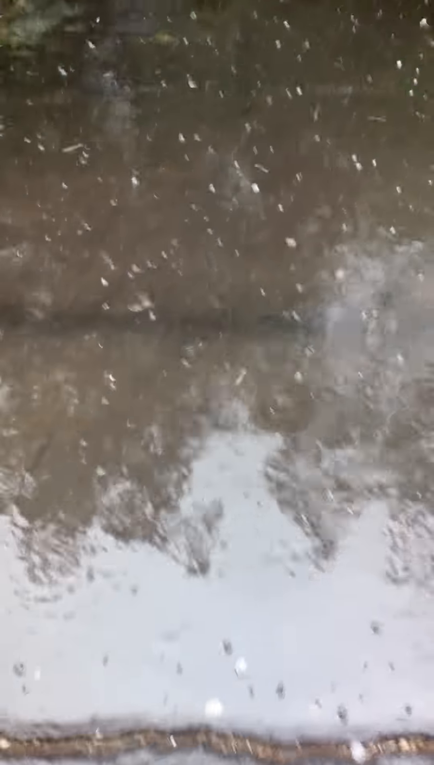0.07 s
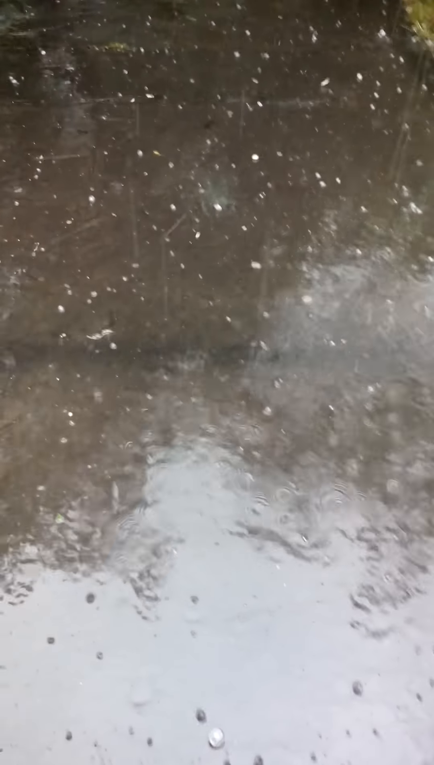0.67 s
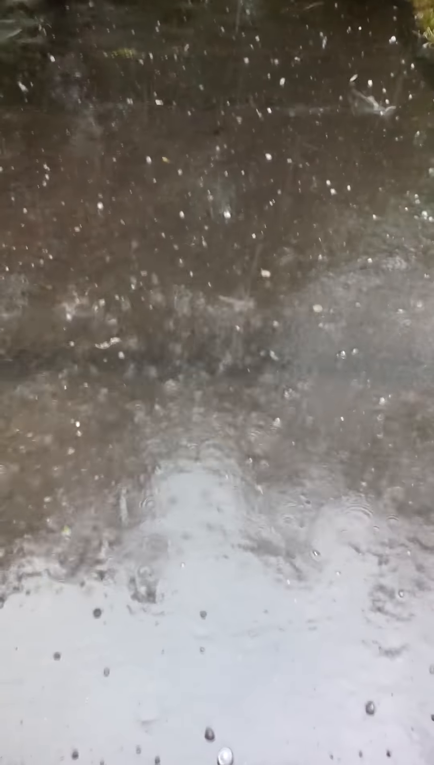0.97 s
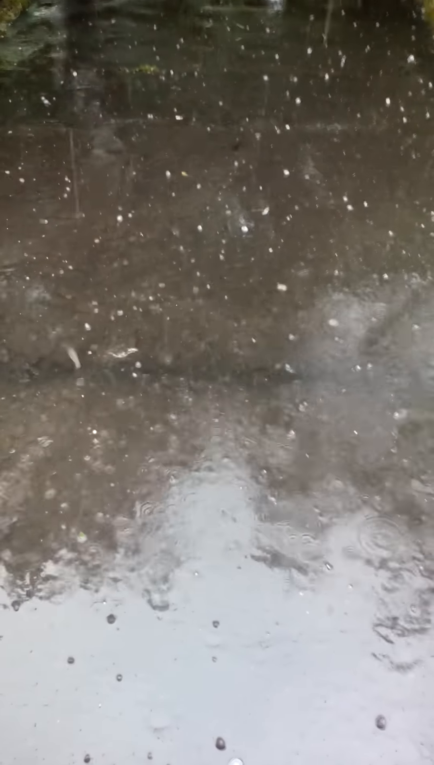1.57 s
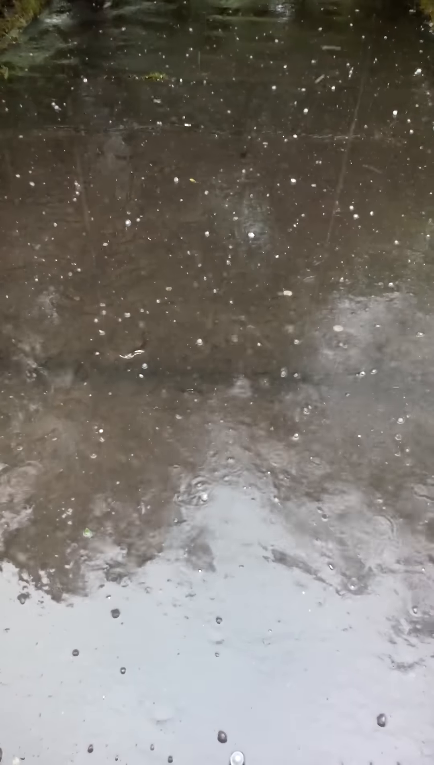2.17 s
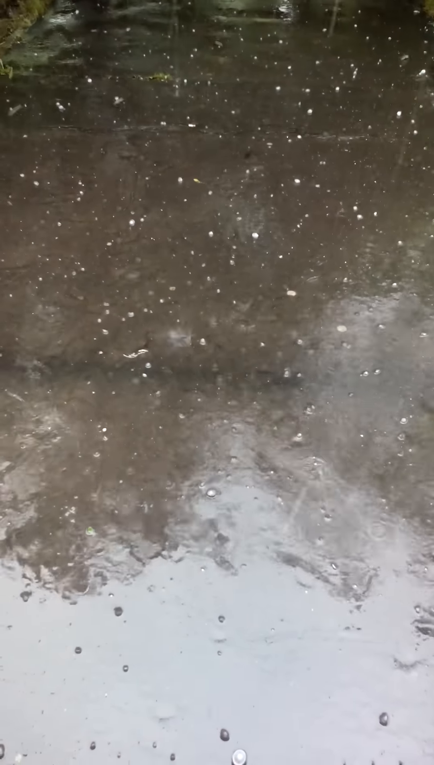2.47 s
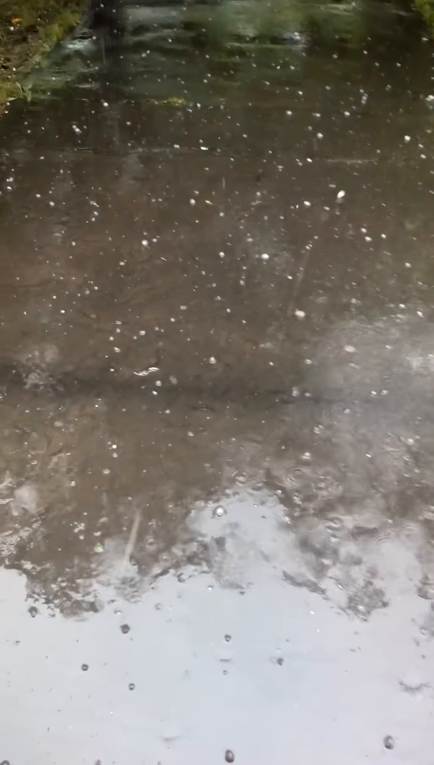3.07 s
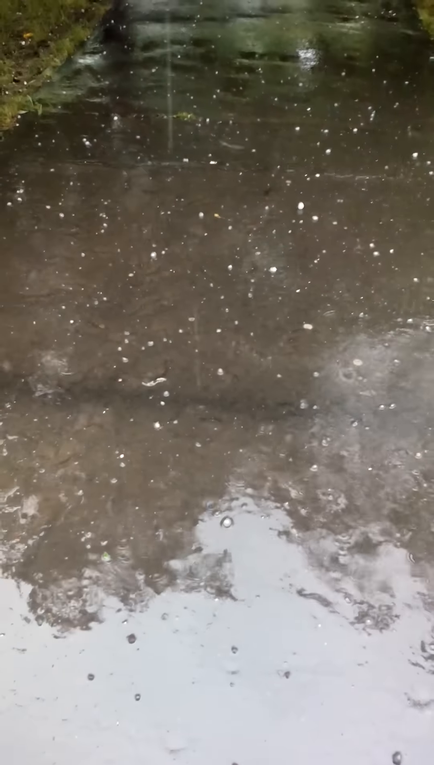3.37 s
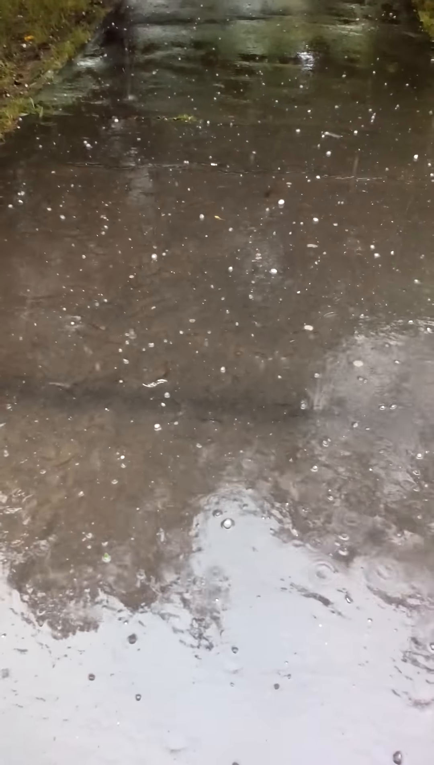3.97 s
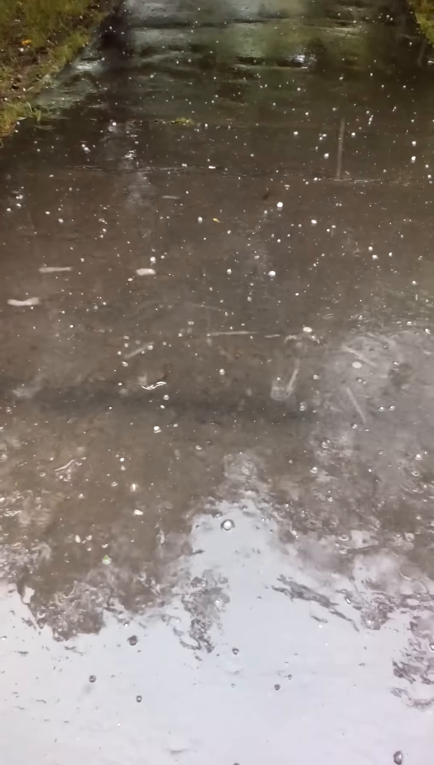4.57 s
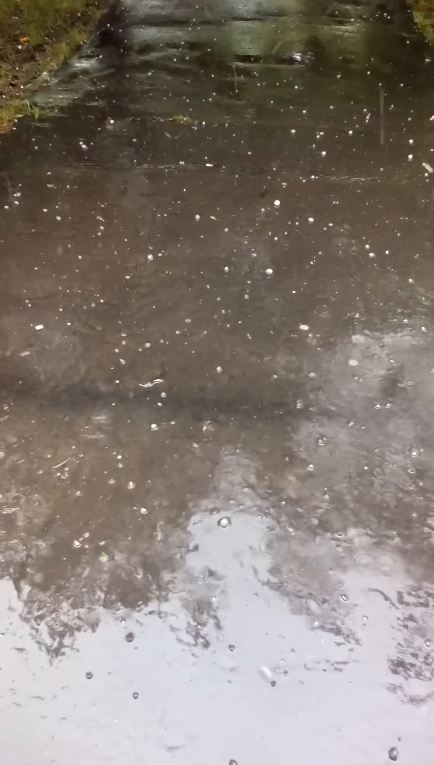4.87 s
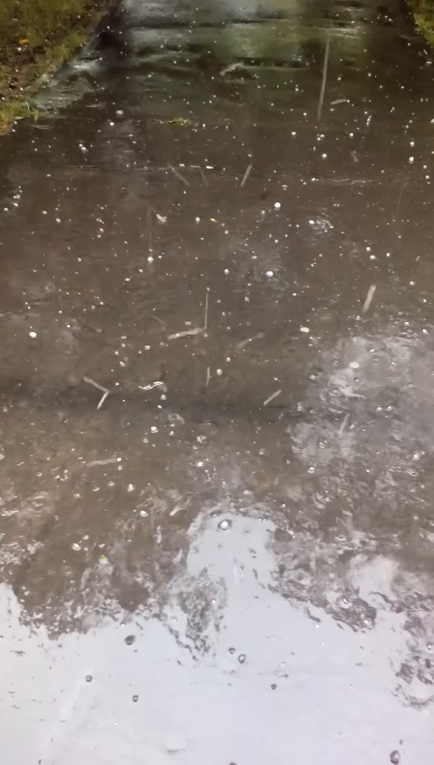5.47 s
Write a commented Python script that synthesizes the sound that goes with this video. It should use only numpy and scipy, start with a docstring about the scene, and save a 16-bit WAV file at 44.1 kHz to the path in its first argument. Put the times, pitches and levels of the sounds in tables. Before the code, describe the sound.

Hail and heavy rain come down on standing water outdoors, close to the microphone. Stones plunge in several times a second with bright, irregular splashes, the nearest landing with a sharp crack and a burst of spray. Trapped bubbles ring as plinks and occasional low gulps. A drop knocks dully on the microphone near the start. Behind it all, countless drops hiss and faint plinks scatter across the water.

```python
"""Hailstones land in standing water in heavy rain, close to one microphone.
They throw up bursts of spray and clouds of bubbles; the nearest land with a crack, and some trap
air that rings as a plink or a low gulp. One drop knocks on the microphone housing. Further out
are faint plinks and the hiss of countless drops. Loud hits clip and briefly duck the gain."""
import sys
import numpy as np
from scipy import signal
from scipy.fft import rfft, irfft, next_fast_len
from scipy.io import wavfile
from scipy.ndimage import uniform_filter1d

SR = 44100
rng = np.random.default_rng(int(sys.argv[2]) if len(sys.argv) > 2 else 0)


def unload_wav(signal):
    """Save mono or channel-first audio to the path in sys.argv[1] as 16-bit WAV at rate SR, clipped to [-1, 1]."""
    wavfile.write(
        sys.argv[1],
        SR,
        np.round(np.clip(np.atleast_2d(signal).T, -1, 1) * 32767).astype(np.int16),
    )


N = 243431


# stones plunging in near the microphone, plus the ringing part of the first hard strike (row at 0.17 s): t/s,
# level/dB, centre f/Hz, width/Hz, t60/s
PLUNGING_STONES = [ (-.025, -16, 3900, 8060, 0.27), (.045, -20, 7000, 7000, 0.32),
                   (.17, -10.5, 4600, 1490, 0.39), (.24, -12, 1460, 1390, 0.28),
                   (.3, -23.5, 400, 400, 0.22), (0.535, -11.5, 6020, 650, 0.25),
                   (0.864, -19.5, 1560, 700, 0.41), (.985, -15, 2480, 3600, .5),
                   (1.0, -22.5, 720, 700, 0.44), (1.065, -13, 4300, 1900, 0.34),
                   (1.279, -21, 5430, 1600, .17), (1.46, -18.5, 720, 686, 0.18),
                   (1.474, -12, 3360, 3530, 0.68), (1.58, -23, 143, 110, 0.53),
                   (1.598, -12.5, 2500, 3630, 0.8), (1.665, -24, 400, 298, 0.69),
                   (2.025, -19, 1920, 2200, 0.52), (2.055, -30.5, 260, 260, 1),
                   (2.285, -22.5, 7100, 3000, .45), (2.368, -21, 910, 1600, 0.17), (2.53, -20, 900, 990, 1),
                   (2.563, -13.5, 3730, 5040, .55), (2.835, -15.5, 1500, 910, 0.13),
                   (2.907, -12, 5150, 2600, 0.3), (3.005, -21, 610, 980, 0.63),
                   (3.005, -16.5, 7260, 7000, 0.27), (3.224, -13, 4540, 2200, 0.45),
                   (3.465, -16, 2660, 3050, 1), (3.607, -13.5, 5570, 2100, 0.37),
                   (3.72, -26.5, 353, 417, 1), (3.883, -17, 1650, 1500, 0.82),
                   (4.074, -11, 4640, 6800, 0.44), (4.135, -13.5, 1010, 1500, 0.55),
                   (4.145, -11.5, 3170, 2390, 0.35), (4.245, -14.5, 2360, 900, 0.29),
                   (4.37, -18, 5660, 7000, 0.69), (4.545, -10, 2300, 2010, 0.41),
                   (4.601, -16, 6400, 9000, 0.33), (4.64, -11, 3150, 3570, 1),
                   (4.75, -15, 2060, 1220, 0.72), (4.83, -9.5, 6340, 2900, 0.53),
                   (4.828, -22.5, 11400, 4300, 0.39), (4.97, -26.5, 128, 100, 0.57),
                   (5.017, -17.5, 11580, 12300, 0.14), (5.087, -16.5, 1410, 1180, .25),
                   (5.204, -14.5, 4300, 2700, 0.7), (5.384, -13.5, 2070, 5330, 1)]
def plunges():
    """Close by, stones splash into the water; every crater opens in about the same time."""
    return spray(PLUNGING_STONES, swell_s=0.031)


# nearest hard strikes: t/s, crack level/dB, spray level/dB, spray centre f/Hz, spray width/Hz
NEAR_STRIKES = [(0.1866, 11, -9.5, 5740, 8160), (.507, -0.5, -16, 3660, 7060),
                (0.6524, -10, -15.5, 4380, 5000), (.731, -12, -23.5, 8400, 7100),
                (1.1134, -2.5, -15, 4600, 1500), (1.2465, 1, -17, 5650, 2670),
                (1.8138, 5, -10.5, 4130, 2000), (2.1149, 1, -15.5, 3860, 2400),
                (2.616, 6, -10.5, 3080, 2600), (2.9372, 7.5, -20, 5600, 6000),
                (3.0355, -6, -28, 9200, 3000), (3.5845, 4, -22, 5970, 8000), (3.8366, 4.5, -10, 4670, 4020),
                (4.0242, 0.5, -18, 5950, 700), (4.4618, -5, -12.5, 3950, 2450), (4.53, 7, -9.5, 4130, 5930),
                (5.1529, 3, -10, 3850, 6000)]
def strike_spray(t60_s):
    """Right by the microphone, spray leaps up at once from each hard strike."""
    return spray([(s, db, hz, width, t60_s) for s, _, db, hz, width in NEAR_STRIKES], swell_s=0.0039)


def cracks(gain_db, hz, t60_s, roughness, rebound_s, rebound_db):
    """In those strikes hard ice rings for a few ragged cycles, then touches once more."""
    out, t = np.zeros(N), np.arange(1024) / SR
    envelope = np.minimum(t / 0.00014, 1) * from_db(-60 * t / t60_s)
    for s, crack_db, *_ in NEAR_STRIKES:
        for delay, loss_db in (0, 0), (rebound_s * rng.uniform(0.46, 1.5), rebound_db):
            noise = coloured(rng.standard_normal(len(t)), SPRAY_SPECTRUM, band=(hz, hz))
            ring = np.sin(2 * np.pi * hz * t) + roughness * noise
            add(out, s + delay, from_db(crack_db + gain_db + loss_db) * envelope * ring)
    return out


# colour of spray at close range: f/Hz, level/dB
SPRAY_SPECTRUM = [(24, -51), (40, 0), (202, 3.5), (417, -2), (704, -3), (797, -0.5), (1220, 1.5),
                  (1820, -0.5), (1960, 0.5), (2990, -3.5), (3930, -2), (6010, -3.5), (8310, -16),
                  (9650, -15), (15500, -28)]
def spray(rows, swell_s):
    """Each burst is a shower of tiny impacts that excites a cloud of bubbles, swells and dies."""
    out = np.zeros(N)
    for s, level_db, centre, width, t60 in rows:
        envelope = swell_and_die(swell_s, t60)
        impacts = droplets(len(envelope), per_s=20000, spread_db=1.5)
        bubbles = bubble_cloud(impacts, uneven_db=5.5, spacing_hz=64.85)
        shower = coloured(bubbles, SPRAY_SPECTRUM, band=(centre, width))
        add(out, s, from_db(level_db) * envelope * evened(shower, span_s=0.031))
    return out


def bubble_cloud(x, uneven_db, spacing_hz):
    """Every splash holds its own mix of bubble sizes, so some pitches stand out."""
    hz = np.arange(len(x) // 2 + 1) * SR / len(x)
    size_class = np.log1p(hz / 3000) * 3000 / spacing_hz  # the spacing widens towards the treble
    class_db = uneven_db * np.clip(rng.standard_normal(400), -2, 2)
    gain = from_db(np.interp(size_class, np.arange(len(class_db)), class_db))
    return irfft(rfft(x) * gain, len(x))


# air bubbles trapped near the microphone: t/s, level/dB, f/Hz
NEAR_BUBBLES = [(0.039, -15, 1458), (.14, -17, 1045), (0.304, -15.5, 1462), (.998, -15, 1110),
                (1.178, -15, 1178), (1.28, -20, 2007), (1.592, -10.5, 3810), (2.67, -19, 2300),
                (2.662, -11.5, 716), (2.81, -20, 804), (2.825, -14.5, 1307), (3.018, -21, 727),
                (3.024, -16.5, 1380), (3.44, -10.5, 3336), (3.835, -11.5, 2035), (3.85, -18, 1042),
                (4.007, -14.5, 1182), (4.085, -30, 9400), (4.148, -11, 2500), (4.237, -17, 3960),
                (4.519, -11, 6010), (4.612, -9, 5900), (4.84, -14, 4630), (4.85, -15, 1893),
                (5.203, -22, 609), (5.365, -21.5, 332)]
def near_plinks(gain_db):
    """Close bubbles ring out; larger ones are lower, and swell and ring for longer."""
    rows = []
    for s, db, hz in NEAR_BUBBLES:
        slowness = (2000 / hz) ** 0.22
        width_hz, swell_s, t60_s = 0.054 * hz + 42, 0.043 * slowness, 0.34 * slowness
        rows.append((s, gain_db + db, hz, width_hz, swell_s, t60_s))
    return ringing(rows, wander=0.27, flutter_db=2.5)


def ringing(rows, wander, flutter_db):
    """A bubble is a single tone; it wobbles in the churned water, blurring its pitch and loudness."""
    out = np.zeros(N)
    for s, level_db, pitch, width, swell, t60 in rows:
        envelope = swell_and_die(swell, t60)
        smooth = signal.butter(2, width / 2, fs=SR, output="sos")
        wobble, flutter = rms_one(signal.sosfilt(smooth, rng.standard_normal((2, len(envelope)))))
        phase = 2 * np.pi * np.cumsum(pitch + wander * width * wobble) / SR
        tone = rms_one(from_db(flutter_db * flutter) * np.sin(phase))
        add(out, s, from_db(level_db) * envelope * tone)
    return out


def housing_knock(at_s, gain_db, hz, t60_s):
    """A drop hits the microphone housing, which gives one dull, heavily damped swing."""
    out, t = np.zeros(N), np.arange(2048) / SR
    add(out, at_s, -from_db(gain_db - 60 * t / t60_s) * np.cos(2 * np.pi * hz * t + np.pi / 6))
    return bandpass(out, [120, 1500], order=1)


# colour of the rain over the open water: f/Hz, level/dB
RAIN_SPECTRUM = [(25, -19), (50, -13.5), (100, -10.5), (190, 0), (400, -2), (700, 1), (1200, 2.5),
                 (2000, 2.5), (3000, -3), (4200, 2), (6000, -1), (7000, -3.5), (8300, -14.5),
                 (15500, -27.5)]
# slow swells and dips in the level of the background hiss, scaled by `depth`: t/s, level/dB
HISS_LEVEL = [(0.0, -16), (0.63, -20.5), (1.18, -14.5), (1.51, -21), (1.68, -22), (2.08, -16.5),
              (3.49, -17), (4.55, -14), (4.69, -20), (4.95, -15), (5.52, -12.5)]
def downpour(level_db, depth):
    """Drops all over the water merge into a finely grained hiss."""
    s, hiss_db = np.transpose(HISS_LEVEL)
    swing_db = depth * np.interp(np.arange(N) / SR, s, hiss_db - hiss_db.mean())
    hiss = coloured(droplets(N, per_s=14000, spread_db=4.0), RAIN_SPECTRUM)
    return from_db(level_db + swing_db) * hiss


def patter(level_db, per_s):
    """Single drops near the microphone tick out of the hiss."""
    ticks = droplets(N, per_s, spread_db=4.5)
    return from_db(level_db) * rms_one(bandpass(ticks, [2000, 6800], order=4))


def far_plinks(gain_db, range_db, swell_s, t60_s, count):
    """Further out on the water, stones land at random, each with a pitch of its own."""
    when, faintness, height = rng.random((count, 3)).T
    pitches = 170 * (6800 / 170) ** height
    colour_db = np.interp(np.log(pitches), np.log([170, 500, 1200, 5000, 6800]), [-21, 1.5, 2.5, 4.5, 7.5])
    levels = gain_db - range_db * faintness + colour_db
    rows = [(s, db, hz, 0.048 * hz + 35, swell_s, t60_s)
            for s, db, hz in zip(when * N / SR, levels, pitches)]
    return ringing(rows, wander=0.432, flutter_db=0.5)


def fizz(level_db, range_db, fall_db_per_octave, width_hz, swell_s, t60_s, count):
    """Clusters of tiny bubbles fizz briefly high in the treble, fainter the smaller they are."""
    when, faintness, octaves = rng.random((count, 3)).T
    levels = level_db - range_db * faintness - fall_db_per_octave * octaves
    pitches = 7000 * 2 ** octaves
    rows = [(s, db, hz, width_hz, swell_s, t60_s) for s, db, hz in zip(when * N / SR, levels, pitches)]
    return ringing(rows, wander=0.4, flutter_db=7.0)


# resonances of wet surfaces around the microphone: f/Hz, width/Hz, lift/dB
WET_SURFACES = [(335, 25, 3), (723, 25, 4), (1180, 35, 3), (1445, 20, 3), (1942, 120, 2), (3800, 50, 3),
                (5945, 60, 3.5), (6176, 40, 3), (6527, 40, 3)]
def surroundings(x):
    """The struck surfaces all around colour the sound with narrow resonances."""
    hz = np.arange(N // 2 + 1) * SR / N
    lift_db = sum(db / (1 + (2 * (hz - centre) / width) ** 2) for centre, width, db in WET_SURFACES)
    return irfft(rfft(x) * from_db(lift_db), N)


def droplets(size, per_s, spread_db):
    """Tiny impacts at random moments, many small and a few large."""
    strengths = from_db(spread_db * np.minimum(rng.exponential(1, size), 4))
    return (rng.random(size) < per_s / SR) * strengths * rng.choice([-1, 1], size)


def swell_and_die(swell, t60):
    """An envelope that grows for a moment and then dies away."""
    t = np.arange(next_fast_len(int((swell + t60) * SR) + 2)) / SR
    return np.minimum(t / swell, 1) ** 2 * from_db(-60 * np.maximum(t - swell, 0) / t60)


def coloured(x, spectrum, band=None):
    """Give a steady signal a spectrum and, if asked, a broad resonance (centre, width); rms 1."""
    hz = np.maximum(np.arange(len(x) // 2 + 1) * SR / len(x), 1)
    points_hz, points_db = np.transpose(spectrum)
    gain = from_db(np.interp(np.log(hz), np.log(points_hz), points_db))
    if band:
        centre, width = band
        gain = gain / np.sqrt(1 + ((hz ** 2 - centre ** 2) / (hz * width)) ** 4)
    return rms_one(irfft(rfft(x) * gain, len(x)))


def evened(x, span_s):
    """Hold the power steady over a span, keeping the finer flutter."""
    power = np.abs(uniform_filter1d(x ** 2, int(span_s * SR), mode="wrap"))
    return x / np.sqrt(power + 1e-6)


def bandpass(x, edges_hz, order):
    """Keep the band between two edges."""
    return signal.sosfilt(signal.butter(order, edges_hz, "band", fs=SR, output="sos"), x + 1e-18)


def from_db(db):
    """Decibels to gain."""
    return 10 ** (np.asarray(db) / 20)


def rms_one(x):
    """Scale to unit power."""
    return x / np.sqrt(np.mean(x ** 2) + 1e-20)


def add(out, s, sound):
    """Mix a sound in from time s on."""
    at = round(s * SR)
    first, last = max(at, 0), min(at + len(sound), N)
    if last > first:
        out[first:last] += sound[first - at:last - at]


def gain_control(x, threshold_db, share, release_db_per_s, attack_s):
    """A loud hit turns the gain down, too late for its first peak; the rain then swells back."""
    level_db = 10 * np.log10(np.abs(uniform_filter1d(x[0] ** 2, size=44, origin=21)) + 1e-12)
    excess_db = np.maximum(level_db - threshold_db, 0)
    release_db = release_db_per_s * np.arange(N) / SR
    held_db = np.maximum.accumulate(excess_db + release_db) - release_db
    pole = np.exp(-1 / (attack_s * SR))
    return x * from_db(-share * signal.lfilter([1 - pole], [1, -pole], held_db))


def scene():
    """One microphone close to the water: hail in front, rain behind, both channels alike."""
    hail = from_db(3.0) * (strike_spray(t60_s=0.33) + plunges())
    far = far_plinks(gain_db=-28, range_db=5.5, swell_s=0.0343, t60_s=0.27, count=340)
    rain = downpour(level_db=-20.5, depth=0.58) + patter(level_db=-32, per_s=190)
    tiny_bubbles = fizz(level_db=-33, range_db=10, fall_db_per_octave=13, width_hz=600,
                        swell_s=0.006, t60_s=0.14, count=110)
    ice = cracks(gain_db=2.0, hz=4670, t60_s=0.0039, roughness=0.93, rebound_s=0.007, rebound_db=-11.5)
    plinks = near_plinks(gain_db=-1.8)
    knock = housing_knock(at_s=0.3086, gain_db=9.6, hz=290, t60_s=0.0084)
    mono = surroundings(hail + rain + far + tiny_bubbles) + ice + plinks + knock
    return np.array([mono, mono])


def record(dry):
    """Loud hits duck the gain and their first peaks flatten; a low-pass cuts above 15.7 kHz."""
    ducked = gain_control(dry, threshold_db=-3.5, share=0.38, release_db_per_s=65, attack_s=0.0056)
    clipped = ducked / (1 + ducked ** 8) ** (1 / 8)
    lowpass = signal.ellip(14, 0.1, 90, 15700, fs=SR, output="sos")
    return signal.sosfilt(lowpass, clipped)


dry = scene()
out = record(dry)
unload_wav(out)
```